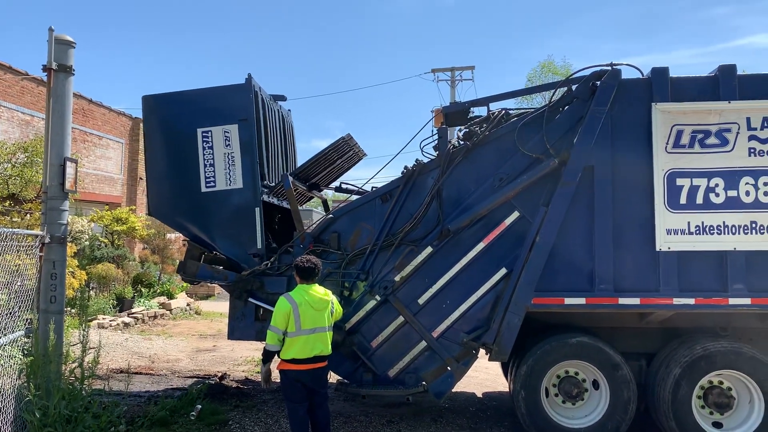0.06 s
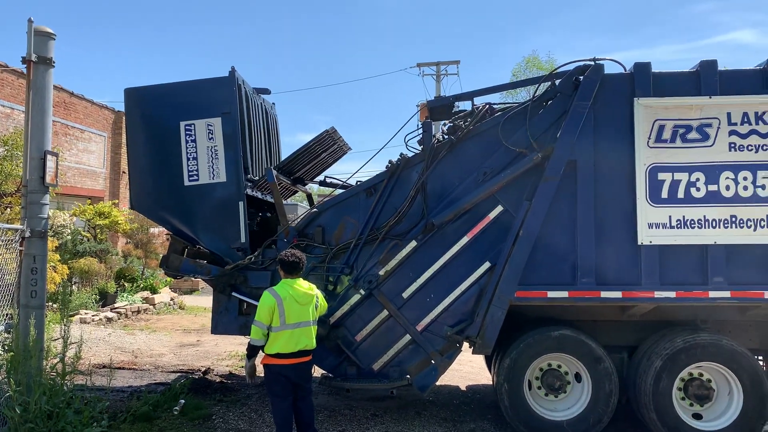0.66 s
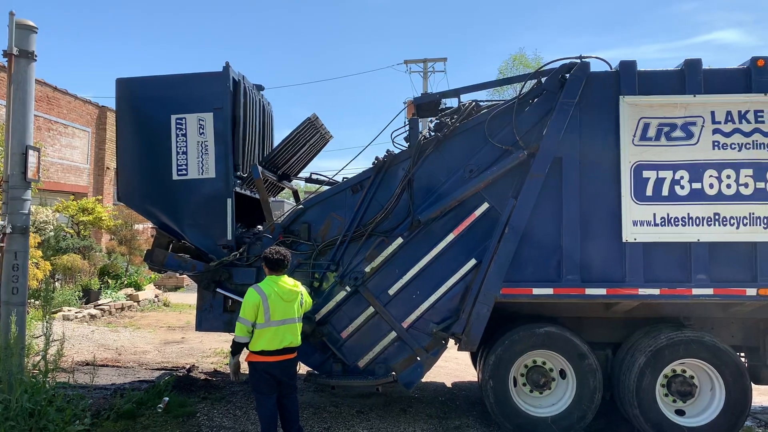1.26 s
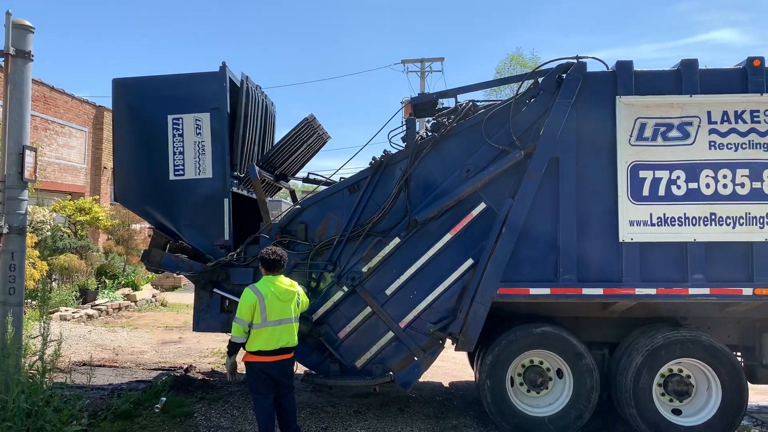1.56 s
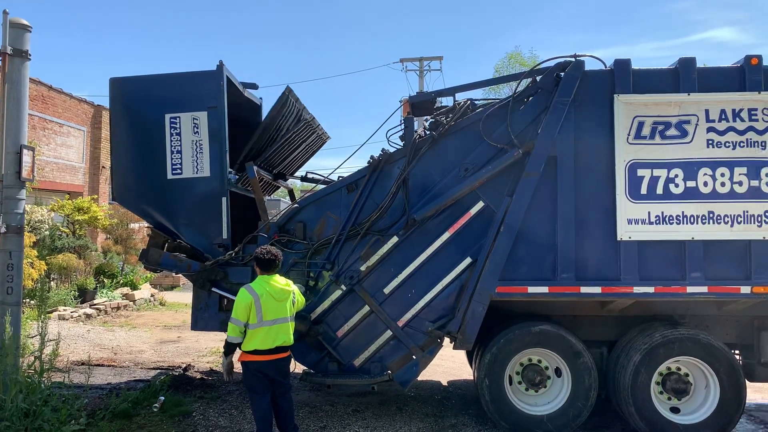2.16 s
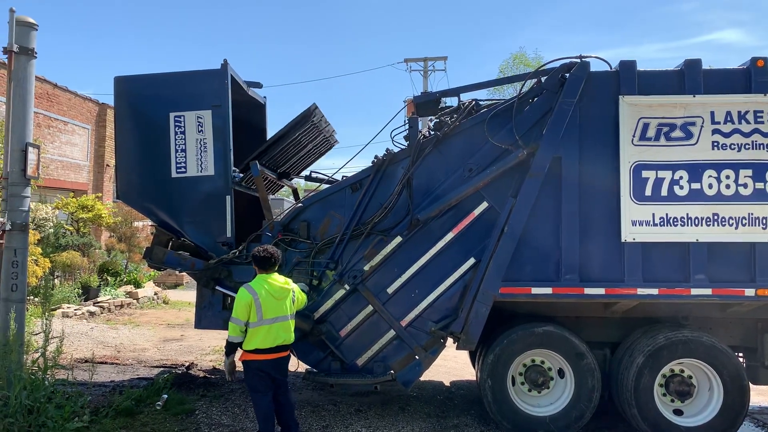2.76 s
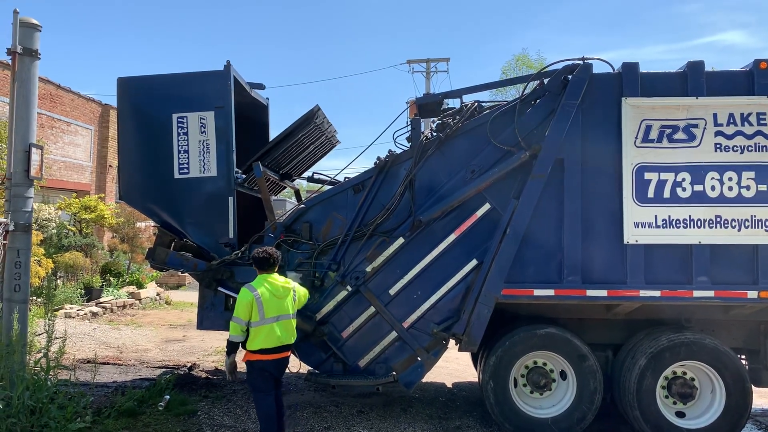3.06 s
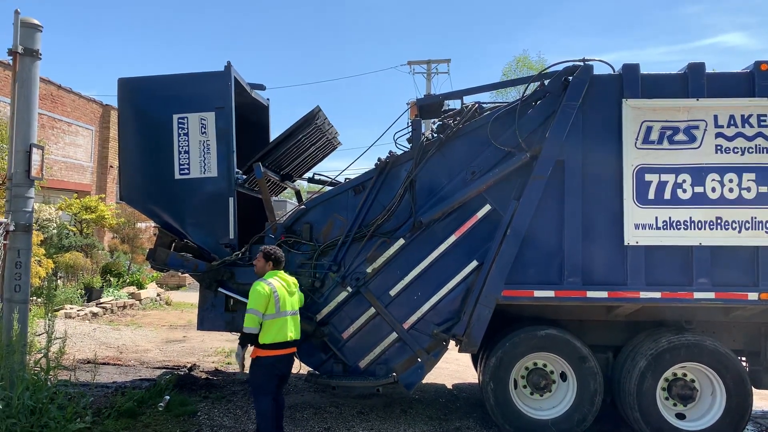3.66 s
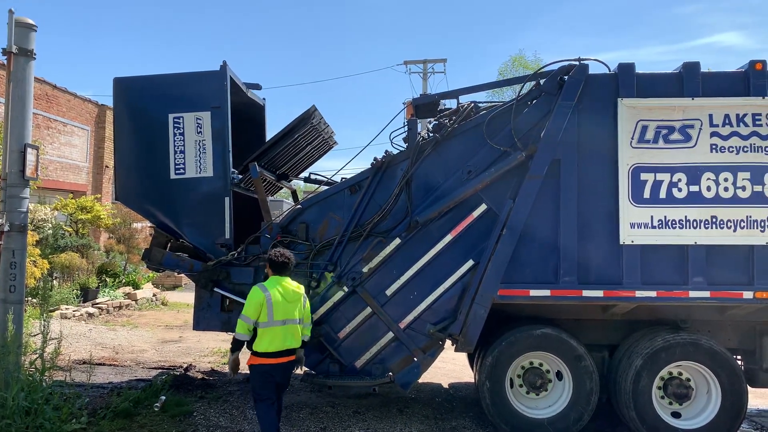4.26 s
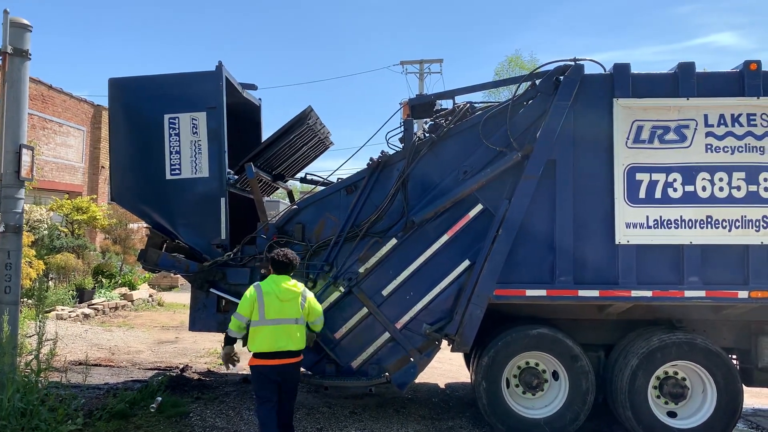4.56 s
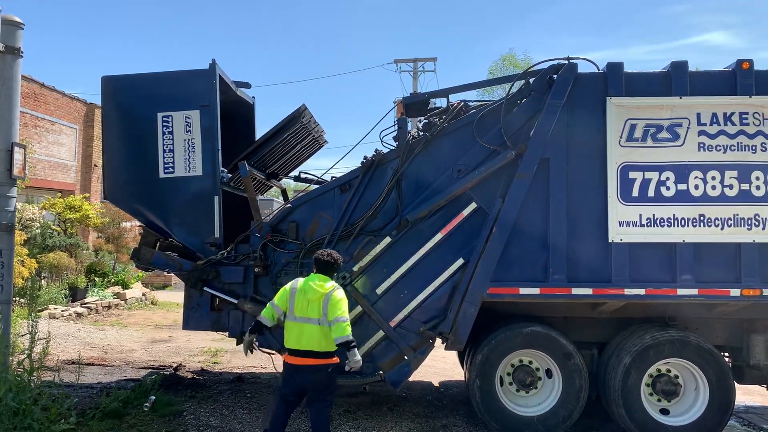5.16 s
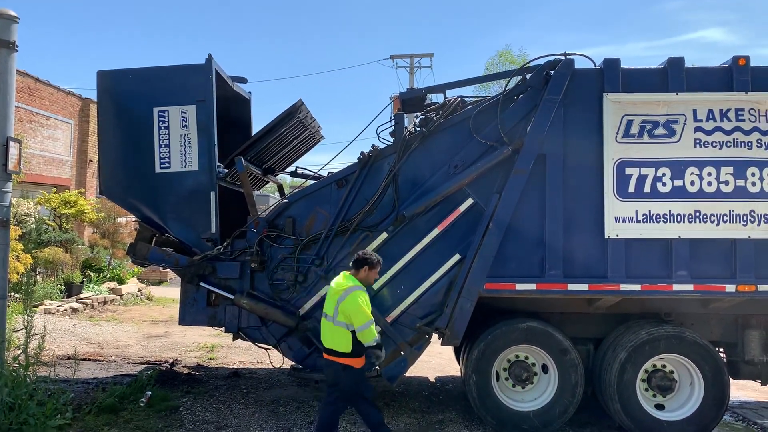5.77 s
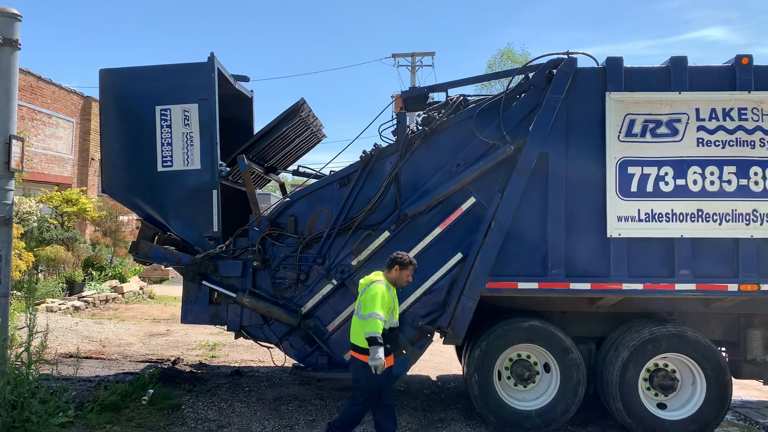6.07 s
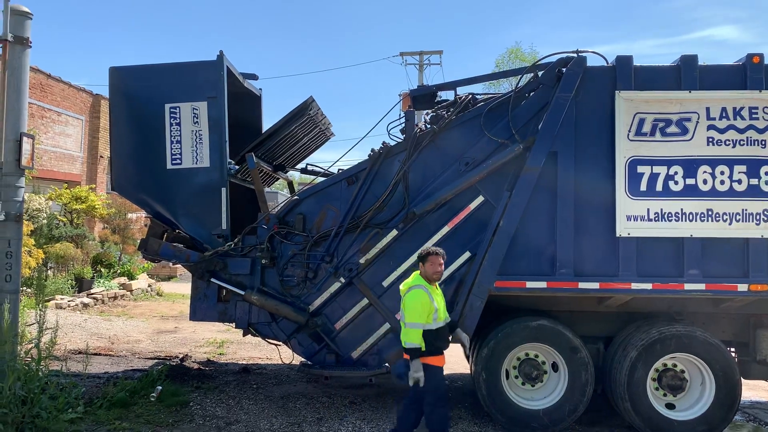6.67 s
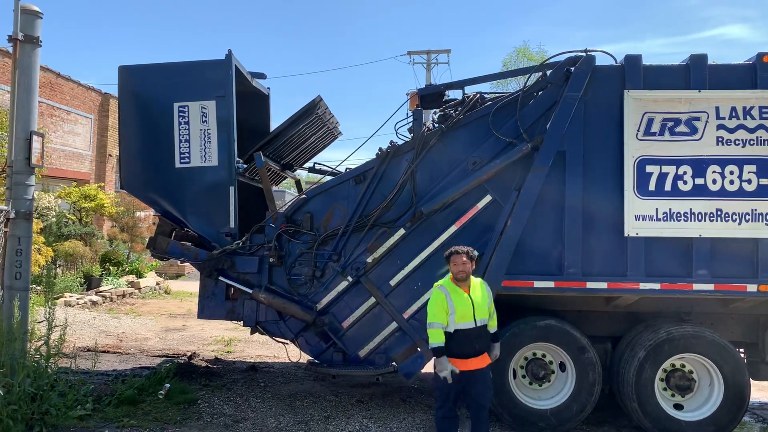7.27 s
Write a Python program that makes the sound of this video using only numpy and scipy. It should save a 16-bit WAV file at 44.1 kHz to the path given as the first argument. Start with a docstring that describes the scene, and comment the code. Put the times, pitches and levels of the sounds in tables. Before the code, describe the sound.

Heard outdoors from a few metres away, a garbage truck rumbles and clatters while its hydraulic pump hums. Compressed air escapes in a sudden hiss, then a hanging steel dumpster knocks several times and rubbish slides out with a short rumble. The diesel slows, picks up again with a rising gear whine and settles, while the lift's links clank now and then.

```python
"""A garbage truck's six-cylinder diesel at fast idle, in a yard, a few metres from a stereo microphone.
It drives a hydraulic pump whose pressure ripple hums while the lift holds a dumpster up. The air dryer
purges with a sharp hiss that ducks the gain control; the engine sags, then revs up again under whining
gears, while rubbish tumbles into the hopper and the hanging steel dumpster knocks and clanks."""
import sys
import numpy as np
from scipy import signal
from scipy.fft import rfft, irfft
from scipy.io import wavfile
from scipy.ndimage import uniform_filter1d, minimum_filter1d

SR = 44100
rng = np.random.default_rng(int(sys.argv[2]) if len(sys.argv) > 2 else 0)


def put_to_file(sound):
    """Save the sound as 16-bit audio at rate SR, in the file named by the first command-line argument."""
    columns = np.atleast_2d(sound).T  # one column per channel
    safe = np.clip(columns, -1, 1)
    whole_steps = np.round(safe * 32767)
    wavfile.write(sys.argv[1], SR, whole_steps.astype(np.int16))


N = 327222
T = np.arange(N) / SR
HZ = np.fft.rfftfreq(N, 1 / SR)


def diesel(crank, drive):
    """Block rumble, injector clatter and hiss, all beating with the cylinders; stereo."""
    # Three spectra. Each row: frequency in Hz, relative level in dB.
    rumble_colour = [(25, -45), (45, -8), (70, -3), (110, -5), (180, -2), (245, 1.5), (310, -5), (400, -9),
                     (500, -7.5), (580, -7), (670, -4.5), (770, -7.5), (980, -6.5), (1350, -15.5),
                     (2000, -31), (4000, -59)]
    clatter_colour = [(700, -37), (1300, 2.5), (1650, 2.5), (2000, 5), (2200, 4), (2290, 2), (2400, 3),
                      (2700, -0.5), (3100, 2.5), (3800, -4.5), (4500, -2.5), (5500, -17), (8000, -31)]
    hiss_colour = [(3000, -27), (5200, 2.5), (7200, 2), (8600, -3.5), (10500, 2), (12200, -3), (13500, -2),
                   (15300, -6.5), (16500, -4.5)]
    chug_db = 1.15 * np.cos(np.pi * crank)
    gain = amp(level("rumble", drive) + chug_db + drift(32))
    rumble = gain * combustion(crank, rumble_colour, depth=0.18, locked=0.77, spread_db=1.4)
    gain = amp(level("clatter", drive) + 1.16 * drift(17))
    clatter = gain * combustion(crank, clatter_colour, depth=0.026, locked=0.29, spread_db=0.1)
    gain = amp(level("hiss", drive) + 1.17 * drift(15))
    hiss = gain * combustion(crank, hiss_colour, depth=0.12, locked=0.5, spread_db=-0.6)
    return rumble + clatter + hiss


def combustion(crank, colour, depth, locked, spread_db):
    """Noise gated by each firing of six unequal cylinders; a locked part repeats every two turns."""
    firing = 3 * crank
    strength = evened(np.array([3.4, 6.0, 1.3, 3.2, 6.3, 0.8]))
    cylinder = amp(spread_db * np.interp(firing, np.arange(6), strength, period=6))
    pulse = evened(np.exp(-(firing % 1) / 0.83))
    gate = cylinder * (1 + depth * (pulse - 1))
    cycle = rng.standard_normal(4096)
    repeat = evened(np.interp(crank / 2 % 1 * len(cycle), np.arange(len(cycle)), cycle))
    direct, scattered = rng.standard_normal((2, N))
    return radiate(gate * (direct + locked * repeat), gate * scattered, colour)


def exhaust(crank, drive, pipe_hz=243, half_width_hz=22, boost_db=4):
    """The boom of three firings a turn; weaker lines swell as they pass the resonance of the stack."""
    # Engine lines: their multiples of the crank speed, and their relative levels in dB.
    orders = [4.5, 5, 6, 8, 9, 10, 11, 12, 13.5, 14, 15.5, 21.5, 22.5, 24, 28.5, 29.5, 31, 39, 45, 58]
    orders_db = [-18, -11, -30, -14, -18.5, -13.5, -17.5, -28, -21, -15, -13, -12, -13, -23, -16.5, -16,
                 -14.5, -10, -16, -19.5]
    boom = amp(level("boom", drive)) * tone(3 * crank, flutter=0.068, rate_hz=13)
    lines = sum(amp(db) * tone(k * crank, flutter=0.83, rate_hz=2.54) for k, db in zip(orders, orders_db))
    stack = amp(boost_db / (1 + ((HZ - pipe_hz) / half_width_hz) ** 2))
    return boom + amp(level("engine lines", drive)) * irfft(rfft(lines) * stack, N)


def growl(crank, drive):
    """While the speed changes the firing pulses sharpen: twice and four times their rate stand out."""
    return sum(amp(level(part, drive)) * tone(order * crank, flutter=0.63, rate_hz=86)
               for part, order in (("low growl", 6), ("high growl", 12)))


def throb(crank, drive, sharpness=8.6):
    """The hardest cylinders shake the block once every two turns, about eleven times a second."""
    # Block resonances. Each row: place in the cycle 0-1, frequency in Hz, width in Hz, relative dB.
    block_modes = [(0.19, 660, 90, -2.5), (0.71, 940, 360, 0.5), (0.02, 930, 300, -2)]
    out = np.zeros(N)
    for place, hz, width_hz, db in block_modes:
        pulse = evened(np.exp(sharpness * np.cos(2 * np.pi * (crank / 2 - place))))
        out += amp(db) * ringing(hz, width_hz) * pulse
    return amp(level("throb", drive)) * out


def tappet(crank, place=0.94, ring_hz=4350, width_hz=60, spread_db=3, scatter=0.005):
    """A loose tappet ticks at one place in each two-turn cycle: short, metallic and uneven."""
    # How hard it ticks. Each row: time in seconds, level in dB.
    tick_levels = [(0, -55), (3.5, -60), (5.3, -54), (5.9, -52.5), (6.45, -57), (6.85, -49.5), (7.42, -50)]
    out, t = np.zeros(N), np.arange(SR // 10) / SR
    for s in T[1:][np.diff(np.floor(crank / 2 - place)) > 0]:
        strength, detune = rng.standard_normal(2)
        ring = np.sin(2 * np.pi * ring_hz * (1 + scatter * detune) * t)
        add(out, s, amp(spread_db * strength) * np.exp(-np.pi * width_hz * t) * ring)
    return amp(curve(tick_levels)) * evened(out)


def speed(inertia_s=0.09):
    """Rate of the pump ripple in Hz; the flywheel rounds off every change."""
    # The pump is geared to the crank, so this paces both. Each row: time in seconds, ripple in Hz.
    ripple_rates = [(0, 217), (1.65, 217.1), (2.3, 218), (2.75, 216.6), (3.02, 191), (3.15, 181.3),
                    (3.4, 158.7), (3.66, 138.5), (3.84, 144.5), (4, 163), (4.45, 228), (4.62, 240.3),
                    (5, 233.4), (5.5, 227), (6.65, 223.8), (7.42, 220.2)]
    return uniform_filter1d(curve(ripple_rates), int(inertia_s * SR), mode="nearest")


def shaft(stumble=0.005):
    """Running count of ripple cycles; the engine runs unevenly as it sags below its governed speed."""
    hz = speed()
    sag = np.clip((hz[0] - hz) / 30, 0, 1)
    return np.cumsum(hz * (1 + stumble * sag * drift(25))) / SR


def controls(full_hz_per_s=137):
    """The drive: octaves off fast idle, fuel, oil pressure and acceleration (0-1, up or down)."""
    # Fuel is cut, then opened to catch the engine. Each row: time in seconds, combustion in dB.
    fuel = [(0, -1.5), (1.3, 0), (2.45, -3.5), (2.77, -5), (2.8, -13.5), (3.45, -9), (3.68, -2.5),
            (4.05, -1.5), (4.27, -1), (4.7, -5), (5.15, -3), (5.65, -4.5), (6.65, -3), (6.9, -1.5),
            (7.42, -1)]
    # Oil pressure is high while the lift works, falls almost to nothing, then partly returns.
    # Each row: time in seconds, pressure 0-1.
    oil_pressure = [(0, 0.86), (1.65, 0.89), (2.45, 0.49), (2.7, 0.2), (2.85, 0.16), (4.4, 0.03),
                    (5.2, 0.31), (6.4, 0.46), (7.42, 0.33)]
    hz = speed()
    acceleration = np.minimum(abs(np.gradient(hz)) * SR / full_hz_per_s, 1)
    return np.array([np.log2(hz / hz[0]), curve(fuel), curve(oil_pressure), acceleration])


def level(part, drive):
    """Level of one part of the truck in dB: each control adds its share."""
    # Each entry: base dB, then dB added per octave of speed, per dB of fuel, at full oil pressure
    # and at full acceleration.
    part_levels = { "boom": (-20, 30, 1.21, 0.5, 2), "rumble": (-27, 11.5, 0.5, 0.5, -2.5),
                   "engine lines": (-32.5, 25, .5, 6, -0.5), "clatter": (-36, 11, 0.36, 2.5, -0.5),
                   "hiss": (-43.5, 7.5, 0.26, 4, 3), "throb": (-43, 1, 2, 7, -5), "fan": (-46, 6, 1, 8, 0),
                   "housing": (-53.5, 15, -0.78, 10, -1), "low growl": (-46, -18, -0.2, -21, 5.5),
                   "high growl": (-52, 21, 1.5, 1, 27), }
    base_db, *shares = part_levels[part]
    return base_db + sum(share * control for share, control in zip(shares, drive))


def pump(turns, drive, stop_s=2.635, surge_db=12.5, rise_s=0.017, decay_s=0.1):
    """Pressure ripple of the hydraulic pump: three harmonics that grow with the oil pressure."""
    # Each row: base dB, dB per octave of speed, dB at full pressure, flutter depth, flutter rate in Hz.
    harmonics = [(-43, -5.5, 10.5, 0.43, 1.9), (-41.5, 11, 12.5, 0.23, 3), (-58, 8, 22.5, 0.8, 2.3)]
    # Resonances of oil lines and body panels. Each row: frequency in Hz, width in Hz, gain in dB.
    panels = [(151, 17, 9.5), (216, 9.8, 4), (235.8, 16.6, 7.5), (305, 14, 6), (358, 25, 3.5), (449, 6, 8),
              (477, 9.5, 10), (707.2, 33, 21)]
    hz = speed()
    octaves, _, pressure, _ = drive
    # The fundamental swells briefly as the lift lands on its stop.
    t = np.maximum(T - stop_s, 0)
    stop_db = surge_db * np.minimum(t / rise_s, 1) * np.exp(-t / decay_s)
    out = np.zeros(N)
    for k, (db, octave_db, pressure_db, flutter, rate_hz) in enumerate(harmonics, 1):
        load_db = octave_db * octaves + pressure_db * pressure
        peak_db = resonance_db(k * hz, panels) + swell_db(k) + stop_db * (k == 1)
        out += amp(db + load_db + peak_db) * tone(k * turns, flutter, rate_hz)
    return out


def whines(turns, drive, fan_ratio=4.217, sweep_loss=0.58, waver_db=0.55):
    """Gear and belt whines follow the shaft through the case resonances; the fan hums with the load."""
    # Pitch of each whine as a multiple of the pump ripple.
    ratios = [8.435, 9.04, 10.038, 11.038, 11.64, 12.648, 16.2, 16.7, 17.18, 20]
    # Each row: base dB, then dB added per octave of speed, at full pressure and at full acceleration.
    whine_levels = [(-48, 10, -14.5, -5), (-53, 20, 1.5, 0), (-50.5, 16, -0.5, 6.5), (-56.5, 20, 9, 1),
                    (-59, 11, -2, -1), (-55.5, 19, 6, -4), (-61, 24, -2, -4), (-63, 3, 1, 9.5),
                    (-62, 10, -2, -14), (-72, -8, 0, 3)]
    # Resonances where a passing whine sings out. Each row: frequency in Hz, width in Hz, gain in dB.
    gear_case = [(1893, 52, 12), (1986, 30, 12), (2275.5, 73, 20.5), (2358, 37, 8.5), (2422, 27, 0),
                 (2570, 570, 4), (2784, 62, 19), (3900, 88, 10)]
    hz = speed()
    octaves, _, pressure, acceleration = drive
    build_up = 1 - sweep_loss * acceleration  # a fast sweep leaves a resonance less time to build
    flutter = 0.08 + 0.4 * acceleration  # the teeth rattle in their backlash
    out = amp(level("fan", drive)) * tone(fan_ratio * turns, flutter=0.29, rate_hz=2.4)
    for ratio, (db, octave_db, pressure_db, acceleration_db) in zip(ratios, whine_levels):
        load_db = octave_db * octaves + pressure_db * pressure + acceleration_db * acceleration
        case_db = resonance_db(ratio * hz, gear_case) * build_up
        gain = amp(db + load_db + case_db + swell_db(ratio) + waver_db * drift(15))
        out += gain * tone(ratio * turns, flutter, rate_hz=29)
    return out


def swell_db(ratio):
    """How far one whine or pump harmonic swells above or sinks below its usual level."""
    # The line each swell belongs to, as a multiple of the pump ripple.
    ratios = [10.038, 11.038, 12.648, 12.648, 10.038, 1, 16.7, 16.7, 20, 2, 3, 10.038, 10.038, 16.2, 11.038,
              3, 2, 12.648, 12.648, 11.64, 12.648]
    # Each row: middle in seconds, half length in seconds, change in dB.
    swells = [(0.199, 0.48, 12.5), (.5, 0.49, 6), (1.62, 0.12, 5), (2.46, 0.42, 3.5), (3.04, 0.048, 5),
              (3.32, .09, -3), (3.32, 0.054, 9.5), (3.92, 0.092, 5), (3.92, .12, 12), (4, .11, 12.5),
              (4.11, 0.057, 25.5), (4.22, 0.037, 5), (4.7, 0.06, -16), (4.79, 0.15, 12),
              (4.86, 0.099, 10.5), (5.13, 0.16, 8.5), (5.5, 0.16, -6), (5.62, 0.12, 11), (5.9, .22, 5),
              (6.25, 0.54, 11), (7.02, 0.15, 7)]
    return sum(db * np.exp(-((T - s) / half_s) ** 2)
               for line, (s, half_s, db) in zip(ratios, swells) if line == ratio)


def housing(drive, rattle_db=2.5):
    """Gear teeth keep the pump housing ringing unevenly, and rattle more when the fuel is cut."""
    # Housing modes. Each row: frequency in Hz, width in Hz, relative level in dB.
    modes = [(1990, 180, -2), (2290, 91, 0.5), (2725, 73, -3.5), (3850, 24, -9)]
    ring = sum(amp(db) * ringing(hz, width_hz) for hz, width_hz, db in modes)
    return amp(level("housing", drive) + rattle_db * drift(32)) * ring


def purge(start_s=1.736, valve_s=0.014, empty_s=1.15, burst_s=0.034, half_burst_s=0.02, dull_hz=11000):
    """Compressed air bursts from the dryer valve, then fades and dulls as the tank empties."""
    # Spectrum of the jet. Each row: frequency in Hz, relative level in dB.
    jet_colour = [(100, -26), (700, -8), (1400, -12), (2300, -2.5), (3300, -4), (4300, -2.5), (5600, -2.5),
                  (7200, -0.5), (8800, 0), (11300, 1.5), (13300, -1), (15400, 1.5), (16500, 6.5)]
    t = np.maximum(T - start_s, 0)
    valve = np.minimum(t / valve_s, 1)
    pressure = np.maximum(1 - t / empty_s, 0)
    burst = amp(-9.5) * np.exp(-((t - burst_s) / half_burst_s) ** 2)
    bleed = amp(-3.5) * pressure ** 3.28
    bright = radiate(*rng.standard_normal((2, N)), jet_colour)
    dull = signal.lfilter(*signal.butter(1, dull_hz, fs=SR), bright)
    jet = pressure * bright + (1 - pressure) * dull
    return jet * valve * (burst + bleed) * amp(0.5 * drift(40))


def dumpster(crack=0.17, crack_s=0.002, attack_s=0.00071):
    """Each knock of the hanging dumpster is a short crack and the ring of its steel walls."""
    # Each row: start in seconds, peak level in dB, treble tilt in dB per octave.
    knocks = [(2.365, -11, -2.5), (2.416, -18, -4), (2.453, -32, -5), (2.642, -24, 4), (2.675, -27, 5),
              (2.735, -28, -2), (2.9, -25, -11), (3.291, -23.5, -3), (3.322, -20, -14), (3.345, -24.5, -9),
              (5.208, -34, -9), (7.145, -22, 0)]
    # Wall modes. Each row: frequency in Hz, relative level in dB, seconds to fall 60 dB.
    wall_modes = [(64.4, -19, 0.26), (108, -2, 0.16), (263, 5, 0.14), (309, -4.5, .7), (348.6, 5.5, 0.19),
                  (503, 3.5, 0.22), (551, 3.5, 0.17), (669, -4, 0.25), (936, 2, 0.16), (1073, -2, .15),
                  (1490, -4, 0.36), (2620, -15, 0.11)]
    out, t = np.zeros(N), np.arange(SR // 2) / SR
    for s, db, tilt_db in knocks:
        ring = sum(struck(t, hz, mode_db + tilt_db * np.log2(hz / 500), t60)
                   for hz, mode_db, t60 in wall_modes)
        snap = signal.lfilter([1], [1, -0.7], rng.standard_normal(len(t)))
        knock = (ring + crack * snap * np.exp(-t / crack_s)) * (1 - np.exp(-t / attack_s))
        add(out, s, amp(db) * knock / abs(knock).max())
    return out


def linkage(crack=0.71, crack_s=0.0057):
    """Pins and links of the lift clank as the load shifts: a bright crack and a short ring."""
    # Each row: start in seconds, peak level in dB, ring frequency in Hz.
    clanks = [(2.426, -26, 4200), (2.629, -24, 3790), (2.649, -18.5, 3782), (3.755, -28, 4180),
              (4.52, -23, 6630), (4.913, -26, 3800), (5.325, -16.5, 3830), (6.076, -24, 3250)]
    # Link modes. Each row: multiple of the ring frequency, relative level in dB, seconds to fall 60 dB.
    link_modes = [(0.259, 5, 0.088), (.62, -2, 0.08), (.895, -10, 0.14), (1, -3, 0.12), (1.06, -7, .06),
                  (1.15, -14, 0.046)]
    out, t = np.zeros(N), np.arange(SR // 4) / SR
    for s, db, ring_hz in clanks:
        ring = sum(struck(t, ratio * ring_hz, mode_db, t60) for ratio, mode_db, t60 in link_modes)
        snap = signal.lfilter([1], [1, -0.5], rng.standard_normal(len(t)))
        clank = ring + crack * snap * np.exp(-t / crack_s)
        add(out, s, amp(db) * clank / abs(clank).max())
    return out


def tumble(start_s=2.365, rise_s=0.0083, decay_s=0.31, gain_db=-36, lumps_db=2.5):
    """At the first knock, loose rubbish slides into the hopper in a lumpy, dying rumble."""
    # Hopper modes. Each row: frequency in Hz, width in Hz, relative level in dB.
    hopper_modes = [(174, 110, 1), (350, 140, -1.5), (800, 330, -17)]
    t = np.maximum(T - start_s, 0)
    envelope = np.minimum(t / rise_s, 1) * np.exp(-t / decay_s)
    drum = sum(amp(db) * ringing(hz, width_hz) for hz, width_hz, db in hopper_modes)
    return amp(gain_db + lumps_db * drift(30)) * envelope * drum


def radiate(direct, scattered, colour):
    """Coloured sound reaches the microphone part direct, part scattered by the yard; mid at rms 1."""
    # Each row: frequency in Hz, likeness of left and right 0-1.
    likeness = [(60, 0.78), (240, 0.88), (500, 0.45), (1100, 0.083), (1900, 0.043), (3300, 0.68),
                (4400, 0.41), (5500, 0.15), (7200, 0.65), (8500, 1), (15000, 1)]
    same = np.clip(spectrum(likeness), 0, 1)
    mid = rfft(direct) * np.sqrt(1 + same)
    side = rfft(scattered) * np.sqrt(1 - same)
    gain = amp(spectrum(colour))
    pair = microphone((mid + side) * gain, (mid - side) * gain)
    return pair / pair.mean(0).std()


def microphone(left, right):
    """Two spectra reach the microphone's two ports, apart in level and phase; gives stereo sound."""
    # Each row: frequency in Hz, left over right in dB.
    lean = [(60, -5), (150, -3.5), (300, 0), (480, -5.5), (700, -2), (950, -2.5), (1900, 0), (4000, -2.5),
            (5700, -7.5), (7000, -0.5), (15000, 1)]
    # Each row: frequency in Hz, lead of the left port in radians.
    lead = [(300, 0), (900, -.9), (1550, -1.8), (2300, 0), (2700, 1.2), (3100, 3.1), (3900, 6.3),
            (5000, 6.3), (5400, 3.6), (6000, 3.5), (6400, .3), (8600, -3.1), (11000, -6.3), (13400, -9.4),
            (15600, -12.6)]
    port = amp(spectrum(lean) / 2) * np.exp(0.5j * spectrum(lead))
    return irfft(np.array([left * port, right / port]), N)


def tone(turns, flutter, rate_hz):
    """A line of rms 1 that flutters in level and phase."""
    wobble = 1 + flutter * (drift(rate_hz) + 1j * drift(rate_hz))
    return evened((wobble * np.exp(2j * np.pi * turns)).real)


def struck(t, hz, db, t60):
    """One decaying mode of struck steel, at a random phase."""
    return amp(db - 60 * t / t60) * np.sin(2 * np.pi * (hz * t + rng.random()))


def ringing(ring_hz, width_hz):
    """Noise of rms 1 in one resonance."""
    return evened(irfft(rfft(rng.standard_normal(N)) / (1 + (2 * (HZ - ring_hz) / width_hz) ** 2), N))


def resonance_db(hz, peaks):
    """How much a line at hz gains from the resonances near it."""
    return sum(db / (1 + (2 * (hz - centre) / width) ** 2) for centre, width, db in peaks)


def drift(rate_hz):
    """Slow random wander of rms 1."""
    return ringing(0, 2 * rate_hz)


def curve(rows):
    """Points joined by straight lines in time."""
    return np.interp(T, *np.transpose(rows))


def spectrum(points):
    """Points joined by straight lines over log frequency."""
    hz, value = np.transpose(points)
    return np.interp(np.log(HZ + 1), np.log(hz + 1), value)


def amp(db):
    """Decibels to gain."""
    return 10 ** (np.asarray(db) / 20)


def evened(x):
    """Scaled to rms 1."""
    return x / np.sqrt(np.mean(x ** 2) + 1e-20)


def add(mix, s, sound):
    """Lays a sound into the mix at s seconds."""
    part = mix[round(s * SR):][:len(sound)]
    part += sound[:len(part)]


def scene(ripples_per_turn=9.662):
    """The truck in the yard, with the microphone a few metres off its side."""
    turns, drive = shaft(), controls()
    crank = turns / ripples_per_turn
    engine = exhaust(crank, drive) + growl(crank, drive) + throb(crank, drive) + tappet(crank)
    hydraulics = pump(turns, drive) + whines(turns, drive) + housing(drive)
    direct = rfft(engine + hydraulics + dumpster() + tumble() + linkage())
    return microphone(direct, direct) + diesel(crank, drive) + purge()


def gain_control(x, threshold_db=-15, hold_s=0.21, recover_db_per_s=33, attack_s=0.0017):
    """Ducks quickly on loud sound, holds, and recovers slowly."""
    power = signal.lfilter(*signal.butter(1, 18, fs=SR), (x ** 2).mean(0))
    over_db = np.maximum(10 * np.log10(abs(power) + 1e-12) - threshold_db, 0)
    half = int(hold_s * SR / 2)
    held_db = -minimum_filter1d(-over_db, 2 * half + 1, origin=half)
    cut_db = np.maximum.accumulate(held_db + recover_db_per_s * T) - recover_db_per_s * T
    pole = np.exp(-1 / (attack_s * SR))
    return x / amp(signal.lfilter([1 - pole], [1, -pole], cut_db))


def record(dry, edge_hz=15900):
    """Behind the microphone: gain control, then the band limit."""
    low_pass = signal.firwin(511, edge_hz, window=("kaiser", 9), fs=SR)
    return signal.oaconvolve(gain_control(dry), low_pass[None], "same")


dry = scene()
out = record(dry)
put_to_file(out)
```